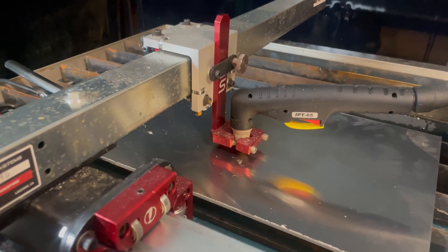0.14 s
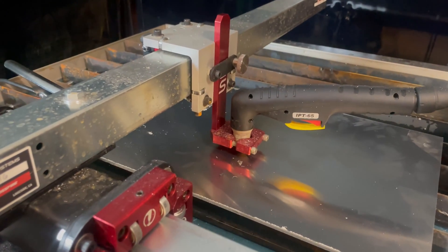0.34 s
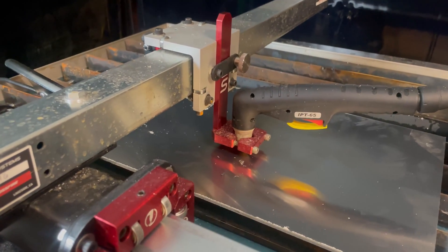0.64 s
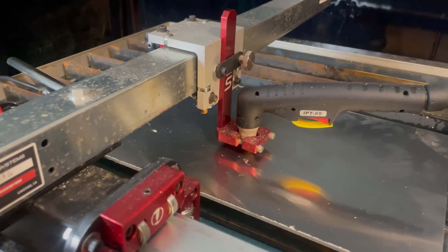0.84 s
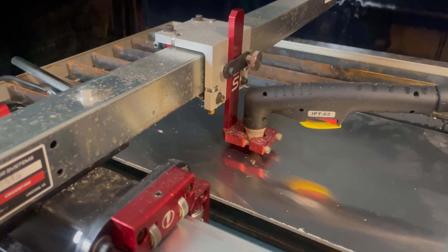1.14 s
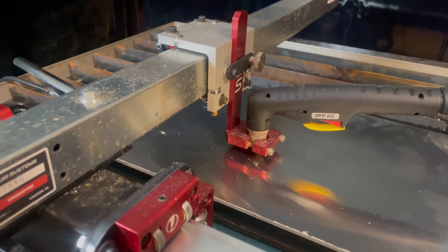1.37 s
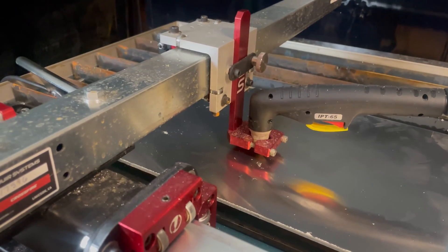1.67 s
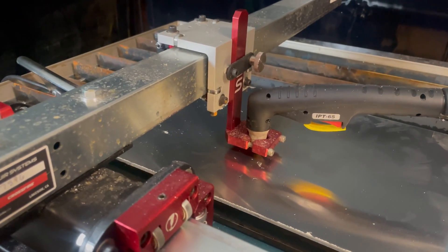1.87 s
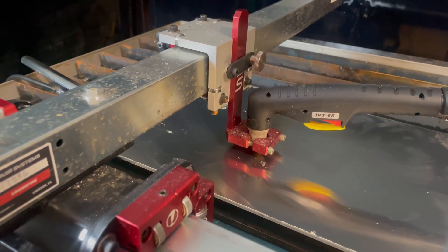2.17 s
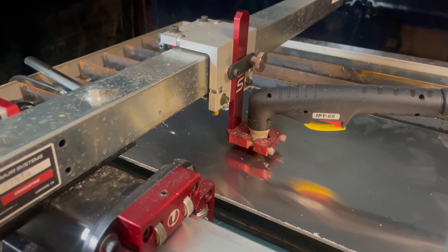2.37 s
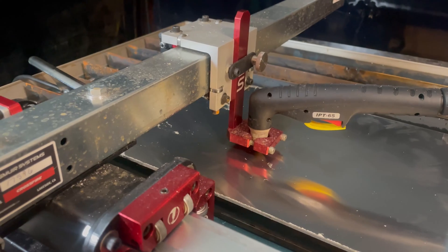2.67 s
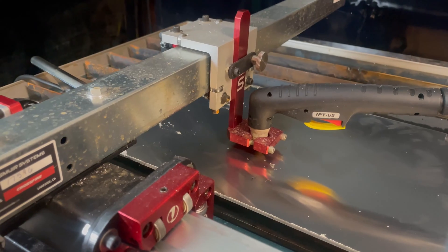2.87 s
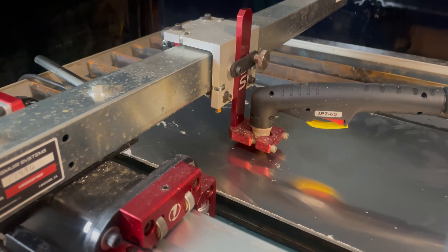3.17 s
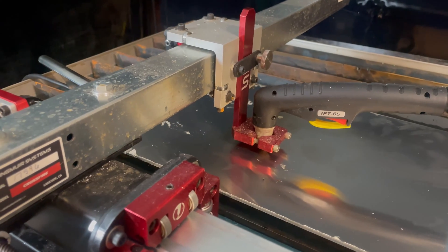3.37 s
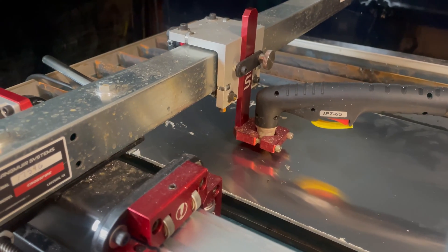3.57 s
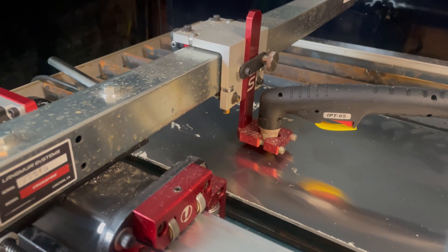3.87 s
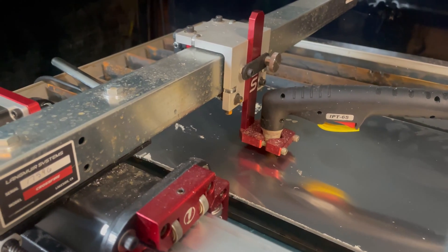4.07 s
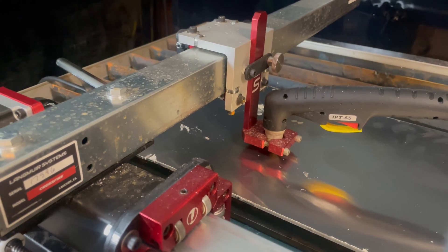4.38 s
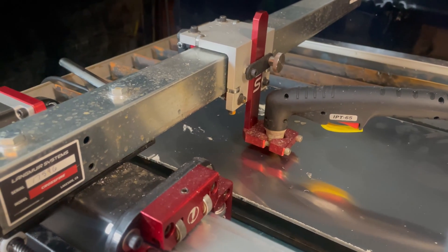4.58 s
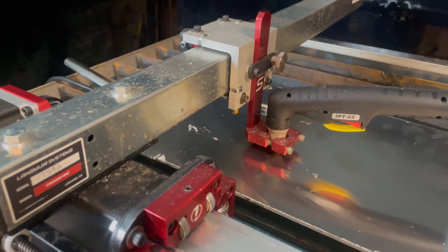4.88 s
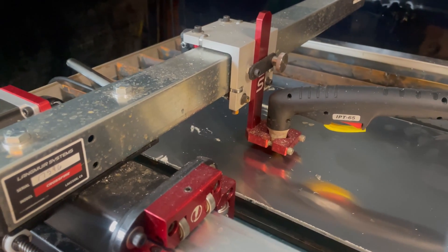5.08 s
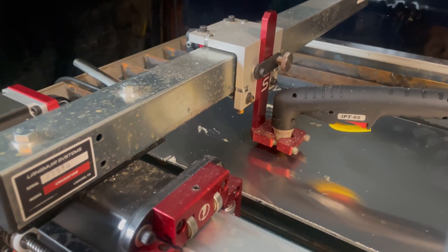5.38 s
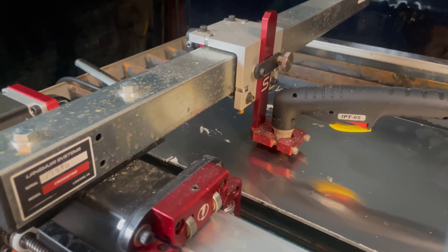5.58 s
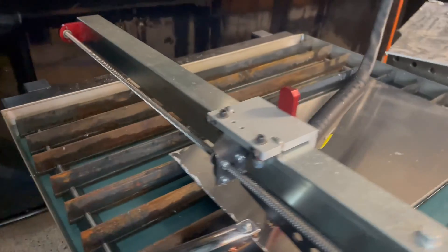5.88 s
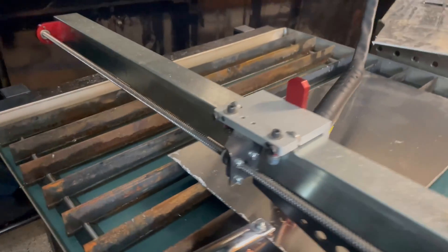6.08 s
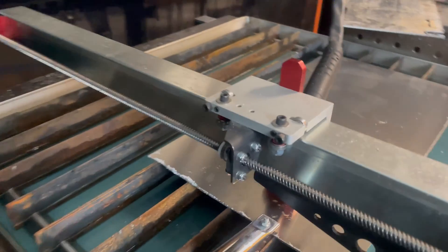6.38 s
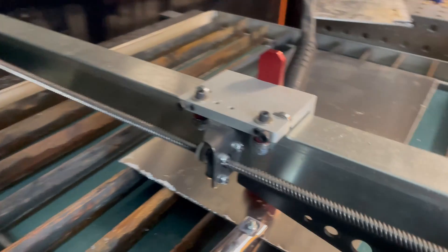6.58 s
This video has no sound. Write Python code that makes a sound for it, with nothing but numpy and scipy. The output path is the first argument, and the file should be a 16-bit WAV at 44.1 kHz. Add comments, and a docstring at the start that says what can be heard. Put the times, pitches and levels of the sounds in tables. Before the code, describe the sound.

From 0 to 1.6 s a quiet workshop: low flickering rumble, faint hiss that swells slightly near 1 s, and a very weak high ring dying away. At about 1.64 s a soft jolt starts the machine; for 0.3 s stepper tones glide, one falling while another rises, rough and metallic as they ring the frame, with a brief low boom. A lighter jolt at 1.94 s ends it. Until 5.7 s a steady, thin whine around 2 kHz with fainter harmonics wavers and gradually strengthens over quiet screw hiss; dull bumps come around 2.6-2.8, 3.4 and 3.65 s. At 5.7 s it cuts abruptly nearer: a bright clack of several impacts and a rattle lasting 0.1 s, then much louder grainy screw rumble, a low hum near 133 Hz and several clashing steady motor whines, with mid-range shaking growing until the abrupt end near 6.7 s.

```python
"""Stepper motors drive the gantry and carriage of a steel cutting table in a quiet workshop.
At first only room rumble, faint hiss and a dying ring are heard. Then a rounded corner: one motor runs down
while another runs up, their gliding step partials ringing the frame, and the second holds its whine.
The scene cuts to a nearer move, with a clack and a short rattle; three motors sound as sets of steady
partials that wander and swell. In both moves, screws rumble as noise filtered by the modes of the frame."""
import sys
import numpy as np
from scipy import signal
from scipy.fft import rfft, irfft, next_fast_len
from scipy.io import wavfile
from scipy.ndimage import uniform_filter1d

SR = 44100
rng = np.random.default_rng(int(sys.argv[2]) if len(sys.argv) > 2 else 0)


def unload_wav(signal):
    """Save mono or channel-first audio to the path in sys.argv[1] as 16-bit WAV at rate SR, clipped to [-1, 1]."""
    wavfile.write(
        sys.argv[1],
        SR,
        np.round(np.clip(np.atleast_2d(signal).T, -1, 1) * 32767).astype(np.int16),
    )


N = 296793
T = np.arange(N) / SR  # time, s
F = np.fft.rfftfreq(next_fast_len(N + SR), 1 / SR) + 1e-3  # filter grid, Hz, kept above 0 for logs

START_S, NEAR_S = 1.632, 5.704  # start of the first move, start of the second, nearer move
END_S = 9  # past the end of the sound
ARC_START_S, ARC_END_S = 1.644, 1.948  # the rounded corner
CORNER_END_S = 1.879  # the corner rumble hands over to that of the first move
FIRST_HZ, NEAR_HZ = 66.53, 66.55  # winding cycles of the steady whines
LEFT_DB = 1.5  # lean to the left below the treble

# frame modes in the corner: pitch_hz, width_hz, level_db (against a broad path of 1)
CORNER_MODES = [(332, 25, -1), (629, 65, 11.5), (800, 85, 5.5), (1163, 48, 5.5), (1363, 95, 4),
                (1743, 80, 8), (2570, 41, 13.5), (2896, 15, 10.5)]
# frame modes in the first move: pitch_hz, width_hz, level_db (against a broad path of 1)
FIRST_MODES = [(501, 7.3, 8.7), (518, 16, 8.9), (574, 18.2, 17.8), (581, 24, 5.8), (641, 5.4, 15.7),
               (741, 8.6, 9.5), (2690, 200, 2.1)]
# broad colour of the screws in the first move: pitch_hz, density_db (relative, per Hz)
FIRST_HISS = [(30, -8), (70, 2), (500, -6.5), (1000, -11.5), (2200, -10.5), (3500, -14), (4900, -20),
              (5800, -15), (7300, -16.5), (9800, -25.5), (11500, -15), (13200, -29), (13900, -21),
              (15000, -26.5)]
# stereo width: pitch_hz, share of unrelated sound (0-1)
WIDE = [(30, 0.067), (300, 0.21), (700, 0.22), (2500, 0.58), (6000, 0.09), (7400, 0.078), (12000, 0.23)]


def undb(db):
    """dB to gain."""
    return 10 ** (np.asarray(db) / 20)


def over_hz(rows):
    """Interpolate a table over log frequency."""
    hz, value = np.array(rows).T
    return np.interp(np.log(F), np.log(hz), value)


def shape(x, response):
    """Filter by a frequency response."""
    return irfft(rfft(x, 2 * len(F) - 2) * response)[..., :N]


def modes(rows, broad=1):
    """Damped resonators in parallel with a broad path."""
    return broad + sum(undb(db) * 1j * F * w / (hz ** 2 - F ** 2 + 1j * F * w) for hz, w, db in rows)


def small_modes(spread_db, width_hz):
    """The many minor modes of sheet steel: random narrow peaks and dips."""
    k = int(width_hz / F[1])
    ripple = uniform_filter1d(uniform_filter1d(rng.standard_normal(len(F)), k), k)
    return undb(spread_db * ripple / ripple.std())


def sheet_ring(t60_s):
    """The dense modes of sheet and slats: a short noisy tail, a little apart left and right."""
    tail = rng.standard_normal((2, N)) * undb(-60 * T / t60_s)
    tail = np.array([tail[0] + .5 * tail[1], tail[0] - .5 * tail[1]])
    return .5 + rfft(tail / np.linalg.norm(tail[0]), 2 * len(F) - 2)


def unit(x):
    """Scale to rms 1."""
    return x / np.sqrt(np.mean(x ** 2))


def walk(rate):
    """Random levels held 1 / rate s and slewed twice; spread near 1."""
    k = int(SR / rate)
    held = np.repeat(rng.standard_normal(N // k + 1), k)
    return 1.11 * uniform_filter1d(uniform_filter1d(held, k), k)[:N]


def after(s):
    """Seconds since a moment, 0 before it."""
    return np.maximum(T - s, 0)


def span(t0, t1, edge=0.0011):
    """Gate with linear edges, lasting edge seconds."""
    return np.clip((T - t0) / edge, 0, 1) * np.clip((t1 - T) / edge, 0, 1)


def noise_pair(gate, response, wide=1):
    """Gated noise through a response, partly unrelated left and right."""
    mid = shape(gate * rng.standard_normal(N), response)
    side = shape(gate * rng.standard_normal(N), response * np.clip(wide * over_hz(WIDE), 0, 1))
    return np.array([mid + side, mid - side])


def stereo_noise(response, gate=1, wide=1):
    """Stereo noise of a colour, rms 1."""
    return unit(noise_pair(gate, response, wide))


def blows(events, push_s, response, attack_s=0.00016):
    """Short noisy pushes into a body, each rising and then dying away exponentially."""
    force = sum(undb(db) * (1 - np.exp(-after(s) / attack_s)) * np.exp(-after(s) / push_s)
                for s, db in events)
    return noise_pair(force, response / np.sqrt(np.mean(np.abs(response) ** 2)))


def arc():
    """Speed shares of the two axes, rising and falling, while the torch rounds a quarter circle."""
    angle = np.pi / 2 * np.clip((T - ARC_START_S) / (ARC_END_S - ARC_START_S), 0, 1)
    return np.sin(angle), np.cos(angle)


def swell(t, dip_s, period_s, first, last, rise_db_s):
    """Level change in dB where two paths of a tone drift in and out of step."""
    second = np.clip(first + (last - first) * (t - t[0]) / (t[-1] - t[0]), 0, 1)
    beat = 1 + second ** 2 - 2 * second * np.cos(2 * np.pi * (t - dip_s) / period_s)
    return 10 * np.log10(beat / (1 + second ** 2) + 1e-3) + rise_db_s * (t - t.mean())


def motor(partials, hz, on, swells, wander_db, wander_hz=8):
    """Clean partials of the winding cycle; each wanders or swells."""
    out, live = np.zeros((2, N)), on > 0
    phase = 2 * np.pi * np.cumsum(hz * np.ones(N))[live] / SR
    drift = [wander_db * walk(wander_hz)[live] for _ in range(6)]
    for n, (k, db, pan_db) in enumerate(partials):
        change_db = drift[n % 6]
        for group, rule in swells.items():  # the last matching group counts
            lo, hi = map(int, group.split("-"))
            if lo <= k <= hi:
                change_db = swell(T[live], *rule) + drift[n % 6] / 2
        tone = np.sqrt(2) * undb(db + change_db) * np.sin(k * phase + 2 * np.pi * rng.random())
        # the pan keeps the mean power and leaves out the lean that record() adds
        lean_db = LEFT_DB * (k * np.max(hz) < 7000)
        left = 1 / (1 + undb(-2 * (pan_db - lean_db)))
        out[:, live] += np.outer(np.sqrt([2 * left, 2 - 2 * left]), tone)
    return out * on


def shop():
    """Low rumble whose level flickers in bursts, faint hiss that swells briefly, and a plate still ringing."""
    # room colour: pitch_hz, density_db (relative, per Hz)
    room = [(18, -47), (30, -5), (146, 1.5), (198, -9), (337, -7.5), (458, -9), (590, -4.5), (781, -25.5),
            (1060, -27), (6310, -42.5), (8350, -48), (13200, -43)]
    rumble_db, hiss_db = -60.5, -58.5
    tail_db, tail_s = 8, 0.11  # the rumble of an earlier move dies away
    swell_db, swell_s, swell_half_s = 2.5, 1.02, 0.22  # swell of the hiss
    ring_db, ring_hz, ring_t60_s = -71, 1997, 2.2

    colour = undb(over_hz(room))
    low = colour / (1 + (F / 800) ** 8)
    high = (colour - low) / (1 + (F / 13000) ** 40)
    high_db = 10 * np.log10(np.sum(high ** 2) / np.sum(low ** 2))
    rumble = stereo_noise(low, undb(2.0 * walk(30)))
    rumble = rumble * undb(rumble_db + tail_db * np.exp(-T / tail_s))
    hiss = stereo_noise(high, undb(.7 * walk(15)), wide=1.5)
    hiss_swell_db = swell_db * np.exp(-((T - swell_s) / swell_half_s) ** 2)
    hiss = hiss * undb(high_db + hiss_db + hiss_swell_db)
    ring_level = undb(ring_db - 60 * T / ring_t60_s + 3 * walk(28))
    ring = ring_level * np.sin(2 * np.pi * ring_hz * T + .9 * walk(30))
    return rumble + hiss + ring


def boom():
    """The lowest beam modes, kept going by the half steps; their swing is nearly even."""
    # lowest beam mode: pitch_hz, width_hz, level_db
    beam = [(124.3, 9.8, 0)]
    # swells of the lowest beam modes: peak_s, peak_db, half_length_s, pitch_hz
    beam_swells = [(1.718, -40.5, 0.076, 127.5), (2.068, -41.5, 0.044, 124.6), (2.216, -45.5, .05, 124.6),
                   (2.436, -51, 0.045, 122), (3.493, -50, 0.081, 135), (3.863, -45, 0.11, 138.8),
                   (4.118, -48, 0.092, 138), (5.05, -55, 0.087, 134)]
    corner_db, first_db, near_db = -44.5, -63, -43

    ring = unit(shape(rng.standard_normal(N), modes(beam, broad=0) ** 2))
    ring = signal.hilbert(ring, 2 * len(F) - 2)[:N]
    # in the nearer move the half steps sit on the mode and lock it
    ring = ring + 2.7 * span(NEAR_S, END_S) * np.exp(4j * np.pi * NEAR_HZ * T)
    ring = ring / (0.43 + 0.68 * np.abs(ring))  # evens out the swing
    level = undb(corner_db) * span(ARC_START_S, ARC_END_S, edge=0.045)
    level += undb(near_db) * span(NEAR_S, END_S, edge=0.028)
    level += undb(first_db + 4.5 * walk(6.4)) * span(START_S, NEAR_S)
    waver = 0.76 * walk(20)
    swells = sum(undb(db) * np.exp(-((T - s) / half_s) ** 2) * np.sin(2 * np.pi * hz * T + waver)
                 for s, db, half_s, hz in beam_swells)
    return level * ring.real + swells


def screws():
    """Nuts and bearings hiss in step with the winding cycle of the first move and ring the frame."""
    # broad colours: pitch_hz, density_db (relative, per Hz)
    corner_hiss = [(30, -26), (150, 6.5), (700, -4), (2000, -11.5), (3600, -8), (4900, -16), (7000, -15.5),
                   (9000, -33), (11500, -19), (13700, -32), (15500, -40)]
    near_hiss = [(30, -4), (90, -6), (500, -5.5), (1200, -5.5), (1620, -12), (1900, -3.5), (2400, -9.5),
                 (3300, -1.5), (3850, -13), (4500, -15.5), (7300, -20.5), (9500, -28), (11400, -24.5),
                 (12800, -24), (13600, -41), (14700, -23), (15500, -47)]
    # frame modes in the nearer move: pitch_hz, width_hz, level_db (against a broad path of 1)
    near_modes = [(332, 61, 8.7), (487.3, 10, 19), (554, 8.1, 16.3), (597, 16, 12.5), (737.5, 15, 16),
                  (833, 69, 5.5), (1154, 19, 11.8)]
    corner_db, first_db, near_db = -37, -52, -38
    attack_s, fade_s = 0.0092, 0.089
    rise_db_s = 22  # the rumble grows through the corner
    settle_db, settle_s = 1, 1  # after the corner the rumble starts louder and settles

    cycle = 2 * np.pi * FIRST_HZ * T
    steps = 1 + 0.11 * np.cos(2 * cycle) + 0.25 * np.cos(4 * cycle)
    since_corner = after(CORNER_END_S)
    turning = np.exp(-since_corner / fade_s)
    rounding = span(START_S, NEAR_S, edge=attack_s) * turning
    rounding = rounding * undb(-rise_db_s * np.maximum(CORNER_END_S - T, 0))
    straight = span(START_S, NEAR_S) * (1 - turning) * undb(settle_db * np.exp(-since_corner / settle_s))
    bass = 1 / (1 + (F / 3300) ** 4)
    out = 0
    for hiss, frame, db, grain_db, level in (
            (corner_hiss, CORNER_MODES, corner_db, 2.5, rounding),
            (FIRST_HISS, FIRST_MODES, first_db, 1.9, straight),
            (near_hiss, near_modes, near_db, 1.5, span(NEAR_S, END_S))):
        colour = undb(over_hz(hiss)) * modes(frame) * small_modes(spread_db=1.8, width_hz=30)
        low, high = colour * bass, colour * (1 - bass)
        # the bass is grainy, the treble fluctuates more gently
        both = stereo_noise(low, steps * undb(grain_db * walk(170))) * np.linalg.norm(low)
        both += stereo_noise(high, steps * undb(1.6 * walk(30))) * np.linalg.norm(high)
        out = out + level * undb(db) * unit(both)
    return out


def screw_bumps():
    """Soft bumps of the screw in the first move: noisy pushes with a soft attack into the frame."""
    # screw bumps: start_s, push_db
    bumps = [(2.579, -51), (2.672, -43.5), (2.76, -42.5), (2.782, -44.5), (3.392, -44), (3.65, -43.5)]
    body = undb(over_hz(FIRST_HISS)) * modes(FIRST_MODES, broad=2.7)
    body = body / (1 + (F / 1250) ** 4) / (1 + (250 / F) ** 4)
    return blows(bumps, 0.037, body, attack_s=0.0066)


def travel():
    """The travelling carriage shakes more and more of the middle modes."""
    # modes that come up with the travel: pitch_hz, width_hz, level_db (relative)
    travel_modes = [(1170, 120, -7), (1427, 42, 2), (1630, 35, -5)]
    end_db, rise_db_s = -44.5, 15
    grainy = stereo_noise(modes(travel_modes, broad=0), undb(1.7 * walk(150)))
    return grainy * undb(end_db + rise_db_s * (T - T[-1])) * span(NEAR_S, END_S)


def corner():
    """Gliding step partials of both axes ring the frame as they cross its modes."""
    # step partials: multiple of the winding cycle, running_up_db, running_down_db
    ramp = [(4, -50, -54), (8, -52, -54), (16, -54, -55), (20, -52, -56), (28, -50, -56), (32, -40, -41),
            (44, -57, -62), (64, -50, -45), (96, -55, -50), (128, -57, -58), (160, -57, -60),
            (192, -57, -60)]
    # jerks of the frame as the corner starts and ends: start_s, push_db
    jolts = [(1.638, -28.5), (1.936, -34)]
    attack_s, shake_end_s, fade_db_s = 0.032, 1.89, 168

    drive, live = np.zeros(N), span(START_S, 2.05) > 0
    for col, share in enumerate(arc()):
        share = share[live]
        phase = 2 * np.pi * np.cumsum(FIRST_HZ * share) / SR
        for k, *db in ramp:
            # countless small modes break each glide up, the upper ones most
            patchy = undb(-.7 * np.sqrt(k) * np.abs(walk(55)[live]))
            # the winding cycle roughens it; upper partials need speed
            speed_gain = share ** ((.034, .016)[col] * k)
            rough = patchy * (1 + .6 * np.cos(2 * phase + k)) * speed_gain
            jitter = .2 * np.sqrt(k) * walk(90)[live]
            drive[live] += undb(db[col]) * rough * np.sin(k * phase + jitter)
    shake = np.clip(after(START_S) / attack_s, 0, 1) * undb(-fade_db_s * after(shake_end_s))
    glides = shape(drive * shake, modes(CORNER_MODES, broad=.8) * sheet_ring(t60_s=.11))
    jolt_body = modes(CORNER_MODES[1::4], broad=0) / (1 + (F / 2500) ** 4)
    return glides + blows(jolts, 0.0098, jolt_body, attack_s=.004)


def clack():
    """A clack of several impacts and a short rattle: noise pushed through the modes of a body."""
    # impacts: start_s, push_db
    impacts = [(5.705, -22), (5.708, -32), (5.731, -26), (5.774, -39), (5.788, -24.5)]
    # body modes: pitch_hz, width_hz, level_db (against a broad path of 1)
    clack_modes = [(785, 97, 17.2), (970, 60, 10.4), (1840, 38, 6.3), (2307, 18, 16.7), (2640, 17, 9.3),
                   (3070, 55, 4.7), (5180, 45, 3)]
    # broad colour: pitch_hz, density_db (relative, per Hz)
    clack_hiss = [(100, -29), (600, -1), (3000, 4), (6000, -4), (8500, -16), (12500, -21), (15000, -27)]
    rattle_db, fade_db_s = -31.5, 66
    rattle_end_s, stop_db_s = 5.80, 220  # from here this steeper fade is added

    body = undb(over_hz(clack_hiss)) * modes(clack_modes)
    level_db = rattle_db - fade_db_s * after(NEAR_S) - stop_db_s * after(rattle_end_s)
    rattle = stereo_noise(body, undb(2.6 * walk(200))) * undb(level_db) * span(NEAR_S, END_S)
    return blows(impacts, 0.0019, body) + rattle


def first_motor():
    """First move, one steady whine: partials locked to the winding cycle of the axis that has run up."""
    # partials: multiple of the winding cycle, level_db, left_minus_right_db
    partials = [(2, -61, 1), (4, -49, 3), (5, -65, 2), (8, -57, -7), (12, -60, -3), (16, -60, -8),
                (18, -74, -5), (20, -54, 6), (26, -70, 8), (28, -53, -3), (30, -67, 1), (33, -75, 2),
                (34, -76, 4), (36, -61, 8), (44, -62, 4), (63, -78, 6), (64, -64, 5), (65, -66, 8),
                (95, -62, 6), (96, -67, 3), (97, -63, 4), (99, -72, 2), (126, -75, 0), (128, -69, 0),
                (158, -70, 0), (162, -76, 0)]
    # faint side partials: level_db -> multiples of the winding cycle
    faint_groups = {-79: (31, 48, 60, 62, 66, 101, 160, 174),
                    -83: (67, 68, 93, 94, 100, 107, 161, 163, 166, 170, 190, 193)}
    # swells as a second sound path shifts: "lowest-highest" multiple -> dip_s, period_s,
    # strength of the second path at start and end (clipped to 0-1), rise_db_per_s
    swells = {"12-12": (6, 6.5, 0.6, 0.7, -0.5), "16-16": (2.9, 7.3, 0.73, .5, 1.8),
              "60-66": (5.38, 3.9, 0.12, 0.52, 0.78), "64-64": (2.75, 3.05, 0.5, 0.78, 1.1),
              "95-99": (5.07, 2.36, 0.18, 0.64, 0.22), "95-95": (2.46, 4.4, 1, 0.3, .1),
              "97-97": (3.5, 2, 6.2, 4, 0.5)}
    # level of the loudest partial, multiple 32: time_s, level_db
    whine_level = [(2.0, -54.5), (2.11, -47), (2.37, -51.5), (2.97, -48.5), (3.21, -51.5), (3.58, -47),
                   (4.18, -45.5), (4.37, -51), (4.7, -43), (4.76, -46), (4.95, -41.5), (5.23, -48),
                   (5.28, -62), (5.34, -44), (5.44, -42), (5.48, -45.5), (5.62, -40.5), (5.69, -42)]
    whine_pan_db = 2.5

    settled = np.clip((T - 1.86) / .12, 0, 1) * span(START_S, NEAR_S)
    hz = FIRST_HZ * arc()[0]
    faint = [(k, db, LEFT_DB) for db, multiples in faint_groups.items() for k in multiples]
    tones = motor(partials + faint, hz, settled, swells, wander_db=1.5, wander_hz=3.06)
    whine = undb(np.interp(T, *np.array(whine_level).T))
    return tones + motor([(32, 0, whine_pan_db)], hz, settled * whine, {}, wander_db=.8)


def near_motors():
    """Second, nearer move, several steady whines: axis, carriage and lift, each on its own winding cycle."""
    # partials: multiple of the winding cycle, level_db, left_minus_right_db
    near_axis = [(16, -55, 1), (32, -50, 1), (48, -45, 9), (50, -62, -1), (64, -55, 7), (80, -59, 4),
                 (96, -68, 3), (112, -76, 1)]
    carriage = [(4, -54, 1), (12, -55, 0), (28, -56, 1), (32, -49, 1), (63, -62, 1), (64, -53, 1),
                (65, -69, 0), (97, -70, -1), (126, -70, 0), (127, -64, 2), (129, -69, 0), (130, -70, 1),
                (158, -70, 0), (162, -70, -1), (190, -63, 0), (194, -62, 0), (198, -66, 0), (200, -68, 0),
                (202, -69, 0), (254, -67, 0), (258, -74, 0)]
    lift = [(71, -59, 6), (96, -63, 11), (128, -63, 4)]
    # further tones: pitch_hz, level_db, left_minus_right_db
    tones = [(2247, -66, 8), (3800, -71, 8), (5167, -71, 3), (6233, -72, 3), (11590, -67, 0),
             (12688, -72, 0)]
    # swells as a second sound path shifts: "lowest-highest" multiple -> dip_s, period_s,
    # strength of the second path at start and end (0-1), rise_db_per_s
    near_swells = {"16-16": (6.0, .9, .35, .2, 9), "32-32": (6.41, 0.67, 0.15, 0.8, .1),
                   "48-48": (5.93, 0.8, .9, .85, 7), "64-64": (6.7, 0.7, .25, .95, .1)}
    carriage_swells = {"32-32": (6.22, 1.04, 0.35, 0.55, .1), "63-65": (5.98, 0.68, 0.19, 0.17, 1.4),
                       "190-258": (5.78, 0.85, 0.99, 0.97, .1)}
    lift_swells = {"128-128": (5.6, 1.2, 0.36, 0.35, .1)}
    carriage_hz, lift_hz = 57.62, 42.79  # winding cycles

    on = span(NEAR_S, END_S)
    whines = motor(near_axis, NEAR_HZ, on, near_swells, wander_db=3.0, wander_hz=14)
    whines += motor(carriage, carriage_hz, on, carriage_swells, wander_db=3.0)
    whines += motor(lift, lift_hz, on, lift_swells, wander_db=3.0)
    whines += motor(tones, 1, on, {}, wander_db=5.0)  # a 1 Hz cycle makes the multiples pitches
    return whines


def scene():
    """Pause, corner, first move with one whine, cut to a nearer move with several."""
    background = shop() + boom()
    frame = screws() + screw_bumps() + travel() + corner() + clack()
    return background + frame + first_motor() + near_motors()


def record(dry):
    """Left and right differ in phase; a lean to the left below the treble, little deep bass, a cut at the top."""
    # left-right phase by pitch: pitch_hz, lead of the left (radians)
    phase_rows = [(0, 0.76), (300, -0.17), (520, -0.86), (1330, -0.52), (1800, -0.7), (2150, -0.94),
                  (3190, 1.49), (4310, 0.56), (5600, 1.15), (6400, -1.22)]
    # left-right phase by pitch, upper end: pitch_hz, lead of the left (multiples of pi radians)
    upper_phase_rows = [(7300, -.5), (7650, -1), (8900, -1), (9600, -1.6), (11000, -2), (12300, -2),
                        (13000, -2.4), (13500, -3), (22050, -3)]
    top_hz = 15700

    leads = np.array(phase_rows + [(hz, np.pi * turns) for hz, turns in upper_phase_rows])
    lead = np.interp(F, *leads.T)
    lean_db = LEFT_DB * np.clip((7400 - F) / 1500, 0, 1)
    # each side takes half of the lean and half of the phase lead
    half = undb(lean_db / 2) * np.exp(.5j * lead)
    bass_cut = F ** 2 / (F ** 2 + 28 ** 2)
    heard = shape(dry, bass_cut * np.array([half, 1 / half]))
    return signal.sosfilt(signal.ellip(8, .2, 70, top_hz, fs=SR, output="sos"), heard)


dry = scene()
out = record(dry)
unload_wav(out)
```